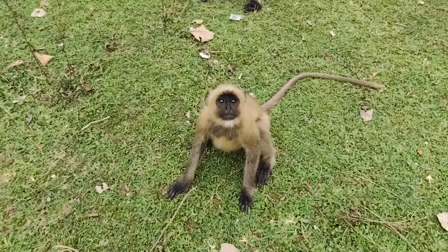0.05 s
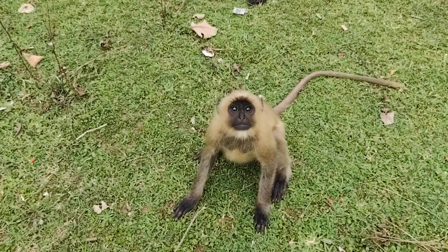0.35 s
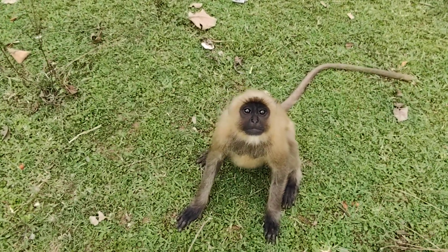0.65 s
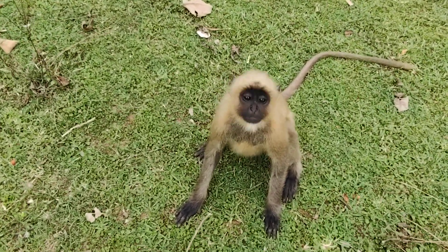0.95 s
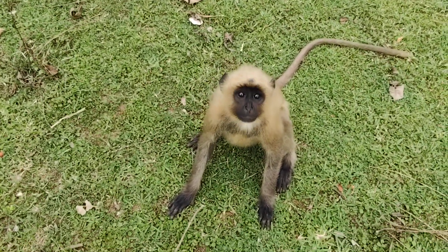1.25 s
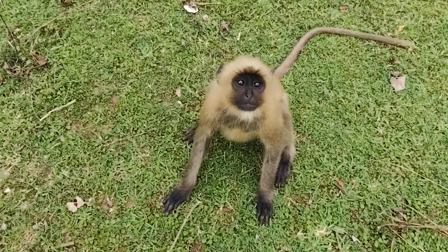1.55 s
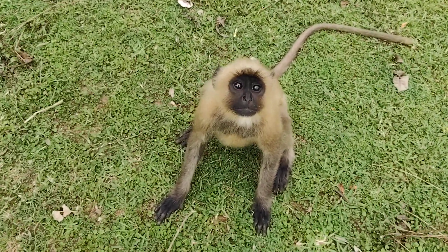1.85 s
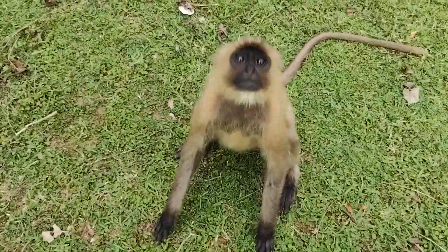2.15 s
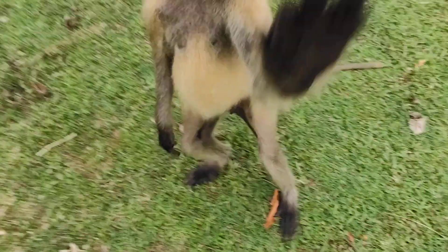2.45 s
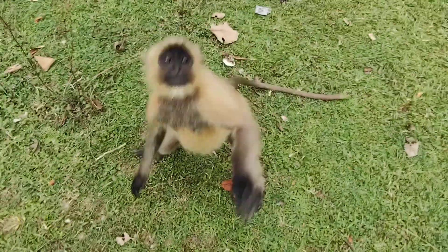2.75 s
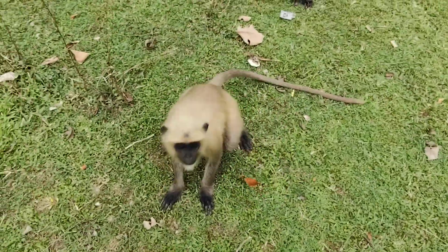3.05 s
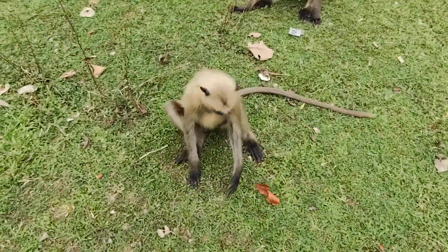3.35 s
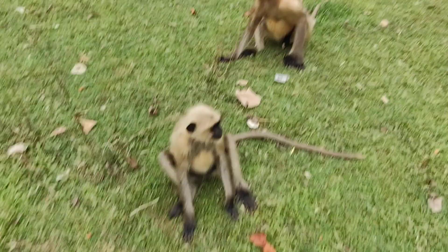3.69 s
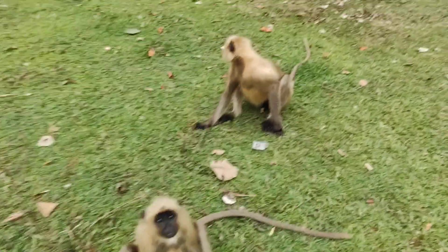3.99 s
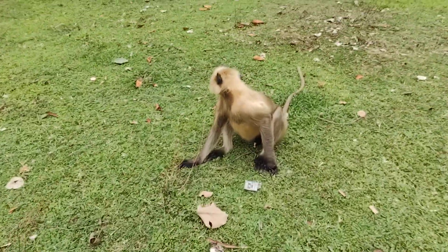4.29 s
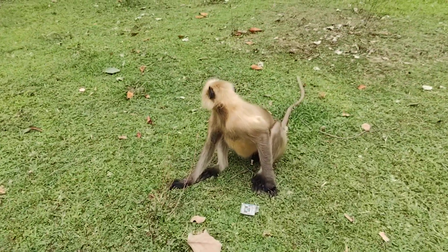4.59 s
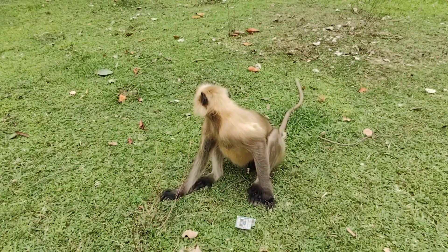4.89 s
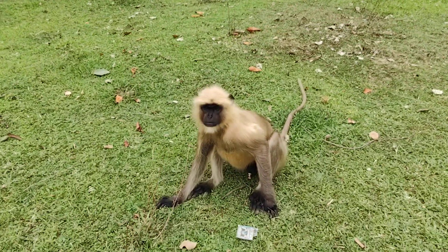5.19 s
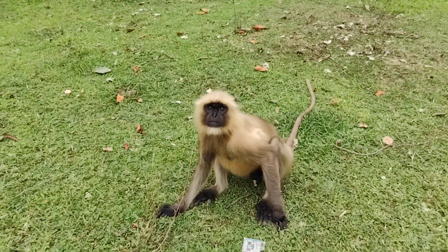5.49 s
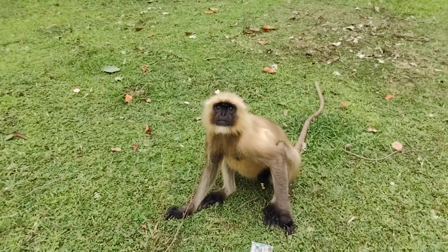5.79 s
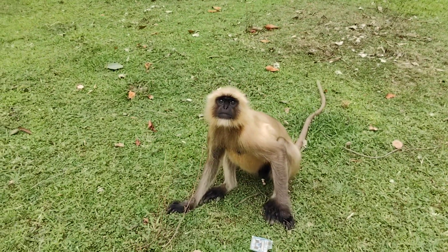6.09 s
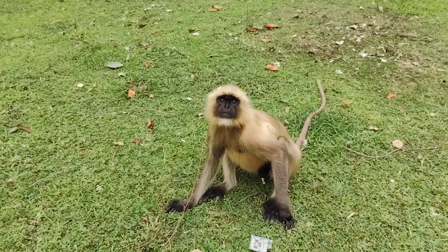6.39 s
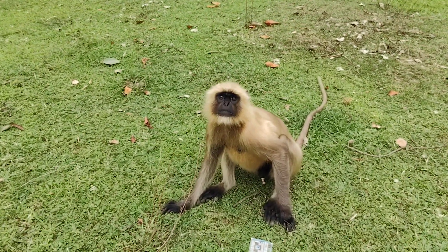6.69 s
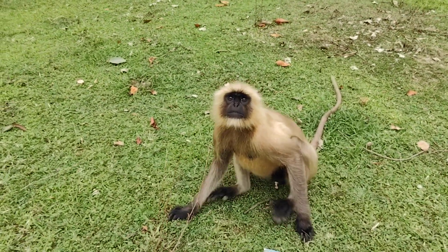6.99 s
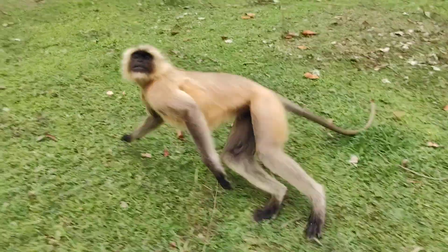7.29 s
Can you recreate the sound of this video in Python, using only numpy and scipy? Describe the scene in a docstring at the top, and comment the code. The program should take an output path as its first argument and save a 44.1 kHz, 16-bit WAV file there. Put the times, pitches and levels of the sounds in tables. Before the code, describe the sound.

A low, gusty wind rumble and faint hiss run throughout on an open lawn. In the first 0.7 seconds, fingers bump and knock on the microphone, mostly on the left, with another low thump at 2.7 seconds. A small bird repeats a high, rising two-note chirp every half second or so, faint at first and clearest from 3.2 to 5.2 seconds. Other birds whistle softly in the trees. A far dog gives several bending howls between 0.6 and 4.7 seconds. Monkeys moving on the grass make soft rustles and tiny stem snaps around 2.6 to 3.4 seconds and 4.3 to 5.4 seconds. At about 5.6 seconds, one sharp, hollow click stands out on the left. More rustling follows from 6 to 6.5 seconds and just after 7, with two light taps. Very faint distant horns drone briefly at 3 seconds and again from 5.

```python
"""A low rumble and a few knocks of fingers on the camera come first, as a small bird starts repeating
a two-note rising chirp. Dry stems snap and grass rustles under monkeys moving on a lawn. Other birds
whistle in the trees, a far dog howls, faint horns drone, and late on comes one sharp, hollow click.
Voices and horns are gliding tones with an echo from the trees, the grass is a spray of tiny snaps,
and the knocks and the click are rings that die quickly."""
import sys
import numpy as np
from scipy import signal
from scipy.fft import rfft, irfft, next_fast_len
from scipy.io import wavfile
from scipy.ndimage import uniform_filter1d, map_coordinates

SR = 44100
rng = np.random.default_rng(int(sys.argv[2]) if len(sys.argv) > 2 else 0)


def to_wav(sig):
    """Store sig (one row per channel, or 1-D mono) as 16-bit WAV at the path in sys.argv[1].

    Samples outside -1..1 are clipped; the rate is SR.
    """
    pcm = np.clip(np.atleast_2d(sig), -1, 1) * 32767
    pcm = np.round(pcm).astype(np.int16)
    wavfile.write(sys.argv[1], SR, pcm.T)  # frames by channels


N = 323914


def amp(db):
    """Turn decibels into a gain to multiply by."""
    return 10 ** (np.asarray(db) / 20)


def unit(x):
    """Scale a signal to an average (rms) level of 1."""
    return x / np.sqrt(np.mean(x ** 2) + 1e-20)


def along(points, hz):
    """Read between (frequency, value) points, on an axis that spaces octaves evenly."""
    freqs, values = np.transpose(points)
    return np.interp(np.log(hz + 1), np.log(freqs + 1), values)


def curves(rows, at):
    """Read each later column of a table at the given places in its first column."""
    places, *columns = np.transpose(rows)
    return [np.interp(at, places, column) for column in columns]


def clock(length):
    """Sample times for a sound of this many seconds."""
    return np.arange(int(length * SR)) / SR


def wobble(rate, size=N):
    """A smooth curve through `rate` random values a second."""
    values = rng.standard_normal(int(size * rate / SR) + 4)
    return map_coordinates(values, [np.arange(size) * rate / SR])


def filtered(x, response):
    """Multiply each frequency in x by response(frequency)."""
    size = next_fast_len(N + SR // 2)
    return irfft(rfft(x, size) * response(np.fft.rfftfreq(size, 1 / SR)), size)[..., :N]


def shaped(x, colour):
    """Turn frequencies up or down by a table of (frequency [Hz], gain [dB])."""
    return filtered(x, lambda hz: amp(along(colour, hz)))


def coloured(x, colour):
    """Shape x, then bring it to an average level of 1."""
    return unit(shaped(x, colour))


def patchy(x, depth_db, frames):
    """Shift the colour of noise at random, in patches some frames long (6 ms a frame)."""
    spectra = signal.stft(x, nperseg=512)[2]
    patches = uniform_filter1d(rng.standard_normal(spectra.shape[1:]), 5, axis=0)
    patches = uniform_filter1d(patches, frames, axis=1)
    return unit(signal.istft(spectra * amp(depth_db * unit(patches)), nperseg=512)[1][:, :N])


def sides(db):
    """Left and right gains for a pan: how many dB louder the left side is."""
    return amp(np.array([[.5], [-.5]]) * db)


def left_first(x, lead_s):
    """Let a sound reach the left ear lead_s seconds before the right."""
    return filtered(x, lambda hz: np.exp(1j * np.pi * hz * lead_s * np.array([[1], [-1]])))


def add(track, start, sound):
    """Mix a sound into a track, `start` seconds in."""
    part = track[..., max(0, round(start * SR)):][..., :sound.shape[-1]]
    part += sound[..., :part.shape[-1]]


def tone(hz, db, fade_s, partials=((1, 0),)):
    """A gliding tone with soft ends; its partials are (multiple of the pitch, level [dB])."""
    t = np.arange(len(hz)) / SR
    phase = 2 * np.pi * np.cumsum(hz) / SR
    ends = np.sin(np.pi / 2 * np.clip(np.minimum(t, t[-1] - t) / fade_s, 0, 1)) ** 2
    return np.sqrt(2) * ends * amp(db) * sum(amp(level) * np.sin(k * phase) for k, level in partials)


def outdoors(x, direct_db, echo_db, lead_s=0):
    """The direct sound plus its echo, scattered by the trees."""
    # how long the echo lasts: (frequency [Hz], time to fall 60 dB [s])
    trees = [(300, 0.22), (700, 0.73), (2000, 0.46), (4500, 0.37), (9000, 0.044)]
    hz, t, spectra = signal.stft(rng.standard_normal((2, SR)), SR, nperseg=256)
    tail = signal.istft(spectra * amp(-60 * t / along(trees, hz)[:, None]), SR, nperseg=256)[1]
    echo = signal.fftconvolve(x[None], tail / np.linalg.norm(tail[0]), axes=1)[:, :N]
    return amp(direct_db) * left_first(x, lead_s) + amp(echo_db) * echo


def background():
    """A low rumble that gives way to gusts when air strikes one side of the microphone, and a hiss."""
    # the rumble's rise and fall: (time [s], level [dB])
    levels = [(0.0, -47.5), (0.36, -40.5), (0.54, -46), (1.26, -54.5), (1.44, -40.5), (1.98, -53),
              (2.76, -40), (3.06, -47), (3.66, -51), (3.78, -56), (4.08, -55), (4.2, -43.5), (4.92, -53),
              (5.22, -47.5), (6.45, -49.5), (6.65, -44), (7.03, -48.5), (7.2, -42), (7.32, -47)]
    # which side the air strikes: (time [s], pan [dB])
    lean = [(0.0, 10.5), (0.39, 8), (0.49, -7), (1.8, 0), (3.68, -14), (3.87, 3), (4.49, -7.5), (7.1, -6)]
    # colours of the rumble, gusts and hiss: (frequency [Hz], gain [dB])
    rumble_colour = [(12, -47.5), (20, -14.5), (54, 2), (72, 6), (88, -1), (134, -15), (225, -30.5),
                     (300, -43), (400, -66), (520, -62.5), (880, -120)]
    gust_colour = [(15, -6), (40, -2.5), (65, -4), (110, -19), (250, -45.5), (600, -58.5)]
    hiss_colour = [(150, 16), (300, 0), (450, 0.5), (660, 14), (900, 0), (1500, -4.5), (4400, -5),
                   (6000, -12.5), (6900, -11), (7700, 8), (8300, 5.5), (9200, -4.5), (11000, -12.5),
                   (14000, -25)]
    now = np.arange(N) / SR
    (level_db,), (pan_db,) = curves(levels, now), curves(lean, now)
    centre = coloured(rng.standard_normal(N), rumble_colour) * amp(-.3 * abs(pan_db))
    swirl = rng.standard_normal((2, N)) * amp(3.5 * wobble(8.6))
    gusts = coloured(swirl, gust_colour) * amp(1.31 * abs(pan_db))
    rumble = amp(level_db) * (.96 * centre * sides(.5 * pan_db) + .33 * gusts * sides(pan_db))
    hiss_db = -63.5 + 1.2 * wobble(3)
    air = patchy(rng.standard_normal((2, N)), depth_db=2.3, frames=16)
    return rumble + amp(hiss_db) * coloured(air, hiss_colour)


def hum():
    """A low drone that wavers in pitch and level."""
    return tone(hz=74.8 * (1 + .025 * wobble(5)), db=-62 + 3.5 * wobble(3), fade_s=.02)


def knocks():
    """Fingers shift on the camera: each touch gives a few dying swings of the case and a dry scrape."""
    # touches: (time [s], level [dB], pitch of the case [Hz], pan [dB])
    touches = [(0.157, -38, 332, 15.5), (0.337, -22, 70.5, 19.5), (.512, -36, 1410, 13),
               (0.538, -34.5, 910, 14), (.579, -22, 1770, 18), (.603, -27.5, 1130, 18),
               (0.703, -38, 870, 4), (2.738, -26, 53, -14), (6.941, -42.5, 1240, 5),
               (7.216, -43, 1170, -10)]
    # colour of the scrape: (frequency [Hz], gain [dB])
    colour = [(300, -22), (1000, 2), (3000, 3), (6000, -25), (8300, 3.5), (12000, -30)]
    contact_s, ring_cycles, scrape_db, scrape_s = .0028, 3.05, -1.5, .0047
    swings, scrapes, t = np.zeros((2, N)), np.zeros((2, N)), clock(.2)
    for start, db, hz, pan_db in touches:
        gain = amp(db) * sides(pan_db)
        ring_s = contact_s + ring_cycles / hz
        envelope = (1 - np.exp(-8 * hz * t)) * amp(-60 * t / ring_s)
        add(swings, start, gain * envelope * np.sin(2 * np.pi * hz * t))
        hardness = min(hz / 1500, 1) ** 2  # soft, low thumps hardly scrape
        scrape = rng.standard_normal((2, len(t))) * amp(scrape_db - 60 * t / scrape_s)
        add(scrapes, start, gain * hardness * scrape)
    return swings + shaped(scrapes, colour)


def near_bird():
    """Each chirp is two overlapping, rising notes, carried by the second harmonic with a noisy rasp."""
    # chirps: (time [s], opening note, its extra level [dB], its starting pitch [ratio],
    # length of the closing sweep [s], level [dB], extra level of the low tones [dB])
    calls = [(.172, "flick", -15, 1, .06, -65, -9), (.972, "flick", -7, 1, .07, -59.5, -7),
             (1.395, "lead", -2, 1.05, .055, -62, -4), (2.066, "flick", -2, 1, .08, -60, -7),
             (2.436, "lead", 0, 1.15, .07, -50, 1), (3.222, "flick", -1, 1, .085, -45.5, -9),
             (3.645, "lead", 1, 1.02, .068, -44, -4), (4.26, "flick", 0, 1, .083, -43.5, -1),
             (5.058, "lead", 0, .99, .07, -42.5, 0)]
    # opening note: length [s]
    opening_s = {"lead": .091, "flick": .061}
    # each note's path: (place in the note [0-1], pitch heard [Hz], level [dB])
    shapes = { "lead": [(0, 4150, -12), (.15, 4400, 1), (.3, 4200, -3), (.45, 4080, -2), (.62, 4500, 2),
              (.82, 4950, 1), (1, 5350, -2)], "flick": [(0, 2950, -18), (.22, 3400, -2), (.45, 3750, -1),
              (.6, 4550, -1), (.8, 4900, 0), (1, 5400, -5)], "sweep": [(0, 2200, -18), (.2, 2530, -5),
              (.31, 2700, -2), (.33, 3000, -16), (.38, 3250, -2), (.55, 3400, -6), (.7, 3650, -3),
              (.82, 4200, 1), (.86, 5100, -8), (.92, 5300, -2), (1, 5500, -7)]}
    # strength of the upper harmonics, and colour of the rasp: (frequency [Hz], gain [dB])
    overtones = [(5000, -24), (6300, -27), (8400, -19), (9300, -29), (11000, -40)]
    rasp_colour = [(900, -21), (2200, -6), (5000, -4), (6000, -22), (8200, -1.5), (11000, -24)]
    overlap_s, near_db = .029, -43.5
    song, scattered = np.zeros(N), np.zeros(N)
    rasp = amp(-13) * coloured(rng.standard_normal(N), rasp_colour)
    for when, opening, opening_db, ratio, sweep_s, db, low_db in calls:
        far_db = max(near_db - db, 0)  # quieter calls are farther off, so more of them is echo
        notes = [(when, opening_s[opening], opening, ratio, db + opening_db),
                 (when + opening_s[opening] - overlap_s, sweep_s, "sweep", 1, db)]
        for start, length, shape, stretch, note_db in notes:
            t = clock(length)
            hz, shape_db = curves(shapes[shape], t / length)
            hz = hz * stretch ** (1 - (t / length) ** 3)
            level_db = note_db + shape_db
            register_db = np.interp(hz, [2800, 3200], [low_db, 0])
            waver = 1 + .016 * wobble(600, len(t))
            flutter_db = 3.5 * wobble(200, len(t))
            partials = [(1, -9 + low_db if shape == "lead" else -30), (2, 0),
                        (3, along(overtones, 1.5 * hz) - 3), (4, along(overtones, 2 * hz))]
            note = tone(hz / 2 * waver, level_db + register_db + flutter_db, .003, partials)
            note += rasp[round(start * SR):][:len(t)] * amp(level_db)
            add(song, start, note * amp(-.07 * far_db))
            add(scattered, start, note * amp(-12 + .77 * far_db))
    return (outdoors(song, direct_db=0, echo_db=-13.5, lead_s=.00028)
            + outdoors(scattered, direct_db=-60, echo_db=0))


def stems():
    """Dry stems break, each with a bright, splintering tick."""
    # breaks: (time [s], level [dB], pan [dB])
    breaks = [(0.45, -46.5, -4), (2.693, -47, -9), (3.064, -51, -2), (3.146, -46, -2), (4.344, -41.5, -4),
              (4.676, -53.5, -1), (4.926, -53.5, 0), (4.945, -46, -3), (5.437, -46, 1)]
    # colour of a tick: (frequency [Hz], gain [dB])
    colour = [(500, -11), (2500, -6.5), (4200, -2.5), (6000, -22), (8200, 14.5), (10500, -10), (14000, -18)]
    track, t = np.zeros((2, N)), clock(.05)
    fade_db = 1 - 60 * t / .052
    for start, db, pan_db in breaks:
        splinters = amp(3 * wobble(1500, len(t))) * rng.standard_normal((2, len(t)))
        add(track, start, amp(db + fade_db) * sides(pan_db) * splinters)
    return shaped(track, colour)


def far_birds():
    """Whistles slide and arch, blurred by the trees; the buzziest are heard mostly as echo."""
    # whistles: (time [s], song, middle pitch [Hz], level [dB])
    whistles = [(.487, "fall", 3830, -64.5), (0.778, "fall", 2875, -73.5), (1.564, "rise", 4520, -62),
                (1.639, "drop", 1046, -68.5), (1.769, "rise", 4810, -68), (2.321, "rise", 4380, -67),
                (2.49, "drop", 1075, -62), (3.764, "hold", 1221, -59), (3.84, "pipe", 1467, -64),
                (3.969, "drop", 1301, -64.5), (4.173, "rise", 4580, -55), (4.691, "pipe", 1128, -62.5),
                (4.865, "fall", 3133, -60), (4.96, "pipe", 1223, -59.5), (5.431, "hold", 3196, -58.5),
                (5.82, "hold", 2265, -69.5), (6.615, "rise", 4660, -58), (6.868, "rise", 4560, -63.5)]
    # songs: (length [s], slide [octaves], arch [octaves], buzz [share of pitch], direct [dB], pan [dB])
    songs = {"rise": (0.09, 0.27, 0.036, .05, -14, 0), "fall": (.11, -0.32, -0.04, .008, -2.5, -6),
             "pipe": (.085, .2, .18, .025, -1.5, 0), "drop": (0.056, -.22, 0.035, .016, -3, 0),
             "hold": (0.08, 0, .005, .016, -5, 0)}
    song, direct = np.zeros(N), np.zeros((2, N))
    for start, kind, middle_hz, db in whistles:
        length, slide, arch, buzz, direct_db, pan_db = songs[kind]
        place = clock(length) / length - .5  # 0 at the middle of the note
        hz = middle_hz * 2 ** (slide * place - arch * (2 * place) ** 2)
        waver = 1 + buzz * wobble(600, len(place))
        note = tone(hz * waver, db + 2 * wobble(120, len(place)), fade_s=.02)
        add(song, start, note)
        add(direct, start, note * amp(direct_db) * sides(pan_db))
    return direct + outdoors(song, direct_db=-60, echo_db=-4.5)


def dog():
    """Distance leaves each howl an almost pure, bending tone; hoarse ones shake and echo more."""
    # howls: (time [s], length [s], arc, top pitch [Hz], level [dB], hoarseness [0-1])
    howls = [(.62, .315, "sag", 675, -56.5, .2), (1.11, .15, "lift", 635, -61.5, .3),
             (1.46, .49, "arch", 755, -57, .2), (2.52, .49, "step", 672, -62, .8),
             (3.31, .52, "step", 672, -64, 1), (4.13, .57, "step", 672, -61.5, .8)]
    # each arc's path: (place in the howl [0-1], pitch [share of the top], level [dB])
    arcs = { "sag": [(0, 1, -6), (.15, .99, 0), (.35, .975, -1), (.5, .975, -10), (.7, .96, 2),
            (.83, .94, 2), (1, .77, -10)], "lift": [(0, .81, -8), (.45, .91, 1), (1, 1, -5)],
            "arch": [(0, .81, -9), (.08, .83, -6), (.11, .92, 0), (.24, .985, -3), (.33, 1, -2),
            (.6, .945, 1), (.82, .91, -2), (.91, .86, 0), (1, .77, -9)], "step": [(0, .88, -3),
            (.08, .85, 3), (.11, .99, 2), (.25, 1, -2), (.7, .99, -1), (.9, .95, 0), (1, .78, -9)]}
    voice, scattered = np.zeros(N), np.zeros(N)
    for start, length, arc, top_hz, db, hoarse in howls:
        t = clock(length)
        ratio, arc_db = curves(arcs[arc], t / length)
        hz = top_hz * ratio * (1 + .028 * hoarse * wobble(110, len(t)))
        flutter_db = 3.8 * hoarse * wobble(55, len(t))
        howl = tone(hz, db + arc_db + flutter_db, fade_s=.008, partials=[(1, 0), (2, -31)])
        add(voice, start, howl)
        add(scattered, start, hoarse * howl)
    return (outdoors(voice, direct_db=0, echo_db=-14, lead_s=.00043)
            + outdoors(scattered, direct_db=-60, echo_db=-4))


def crackle(per_second, spread_db):
    """Stereo noise made of tiny random snaps; spread_db makes their sizes more unequal."""
    snaps = rng.random((2, N)) < per_second / SR
    size = amp(spread_db * np.minimum(rng.exponential(size=(2, N)), 3))
    return unit(snaps * size * rng.standard_normal((2, N)))


def grass():
    """A hand or foot crushes blades and stalks; the blades then spring back in a fading crackle."""
    # presses: (time [s], half width [s], blade level [dB], stalks against blades [dB])
    crunches = [(0.721, 0.045, -70, 5), (2.591, 0.015, -63.5, -17), (2.611, 0.014, -61.5, 2.5),
                (2.642, 0.0068, -61.5, 3), (2.697, 0.0062, -65.5, 2), (2.743, 0.022, -79, 8.5),
                (3.005, 0.032, -63, -3), (3.061, 0.0045, -59.5, -4), (3.151, 0.009, -59, -2.5),
                (3.2, 0.088, -75.5, -0.5), (3.42, 0.064, -76.5, -14), (4.35, 0.038, -66.5, 4.5),
                (4.436, 0.015, -75, 13.5), (5.07, 0.012, -66.5, 8.5), (5.125, 0.024, -70, 6.5),
                (5.207, 0.025, -70, 5), (5.411, 0.039, -71, 7.5), (6.03, 0.019, -68, -15),
                (6.122, 0.015, -58.5, -8), (6.213, 0.02, -60, -8.5), (6.275, 0.019, -65, -17),
                (6.332, 0.026, -57, -27), (6.376, 0.016, -57.5, -3), (6.53, 0.077, -71, -23),
                (7.158, 0.029, -61, -0.5), (7.265, 0.034, -62, -22)]
    # colours of the blades and stalks: (frequency [Hz], gain [dB])
    blade_colour = [(530, -89.5), (900, -11), (1770, -16.5), (2130, -10.5), (2650, -19), (3120, -20),
                    (4180, -7), (5720, -14.5), (6650, -10.5), (8200, 9.5), (11200, -3), (12000, -16),
                    (14500, -15.5)]
    stalk_colour = [(400, -2), (1200, 4), (2200, -1), (3800, 6), (6000, -7.5), (12000, -41)]
    settle_db, settle_s, breaks_per_s = -10, .35, 1400
    now = np.arange(N) / SR
    blades, stalks = np.zeros((2, N))
    for when, width, db, stalk_db in crunches:
        press = amp(db) * np.exp(-.5 * ((now - when) / width) ** 2)
        spring_back = (now > when) * amp(db + settle_db - 60 * abs(now - when) / settle_s)
        blades += press + spring_back
        stalks += press * amp(stalk_db)
    uneven = amp(1.5 * wobble(50) + 2.6 * wobble(350))
    # single dry blades break under the weight, each dying away fast
    breaking = signal.lfilter([1], [1, -.96], rng.random(N) < breaks_per_s / SR)
    fine = crackle(per_second=8200, spread_db=0)
    fine += amp(-17) * unit(breaking * rng.standard_normal((2, N)))
    fine = coloured(patchy(fine, depth_db=3, frames=4), blade_colour)
    coarse = crackle(per_second=1500, spread_db=3)
    coarse = coloured(patchy(coarse, depth_db=4, frames=4), stalk_colour)
    return uneven * (amp(11.5) * blades * fine * sides(2.6) + amp(5.5) * stalks * coarse)


def horns():
    """Faint held notes from a distant road, fading in and out on the moving air."""
    # notes, played 1% below the listed pitch: (time [s], length [s], pitch [Hz], level [dB])
    notes = [(2.987, 0.22, 441, -78.5), (5.103, 0.85, 290, -81), (6.209, 0.66, 350.5, -80),
             (6.81, 0.46, 297, -76.5)]
    drone = np.zeros(N)
    for start, length, hz, db in notes:
        size = int(length * SR)
        fading_db = 4.5 * wobble(16, size)
        waver = 1 + .01 * wobble(25, size)
        add(drone, start, tone(hz * waver, db + fading_db, fade_s=.019, partials=[(.99, .0052)]))
    return outdoors(drone, direct_db=2.5, echo_db=-8.5)


def chorus():
    """A brief burst of 36 faint, overlapping low calls from deep in the trees."""
    start_s, spread_s, call_s = 4.55, .92, .08
    song, place = np.zeros(N), clock(call_s) / call_s
    for when, pitch, slide, softness in rng.random((36, 4)):
        hz = 750 * 2 ** (.9 * pitch + .35 * (slide - .5) * place)
        waver = 1 + .025 * wobble(300, len(place))
        call = tone(hz * waver, -71.5 - 6 * softness, fade_s=.025, partials=[(1, 0), (2, -14)])
        add(song, start_s + spread_s * when, call)
    return outdoors(song, direct_db=-2.5, echo_db=-2.5)


def click():
    """A bright snap to the left, then a small hollow rings, its pitch rising as it opens."""
    # quick contacts that make up the click: (time [s], snap level [dB], hollow level [dB])
    contacts = [(5.532, -40, -48), (5.537, -40, -48), (5.5435, -38, -43), (5.5703, -8, -17.5),
                (5.576, -24, -33), (5.5956, -36, -40)]
    # tones of the snap: (pitch [Hz], level [dB], time to fall 60 dB [s])
    rings = [(7910, 2.5, 0.0048), (8210, 1, 0.0049), (9700, 5.5, 0.0026), (3280, -21, 0.0033),
             (2500, -23, 0.005)]
    # colour of the gritty spray around the click: (frequency [Hz], gain [dB])
    grit_colour = [(300, -2.5), (1700, 16.5), (3700, 9.5), (5200, -26), (8000, 21), (13000, -10)]
    rise_s, open_s, ring_s, spray_s = .0004, .0026, .026, .03
    track, grit, t = np.zeros((2, N)), np.zeros((2, N)), clock(.1)
    snap = sum(amp(db - 60 * t / fall_s) * np.sin(2 * np.pi * hz * t) for hz, db, fall_s in rings)
    snap *= 1 - np.exp(-t / rise_s)
    hollow_hz = 1650 - 450 * np.exp(-t / .0019)
    envelope = np.minimum(t / open_s, amp(-60 * (t - open_s) / ring_s))
    hollow = envelope * np.sin(2 * np.pi * np.cumsum(hollow_hz) / SR)
    for start, snap_db, hollow_db in contacts:
        add(track, start, amp(snap_db) * snap * sides(7.5) + amp(hollow_db) * hollow)
        spray = amp(-60 * t / spray_s) * rng.standard_normal((2, len(t)))
        add(grit, start, amp(-32 + .35 * hollow_db) * spray)
    return left_first(track, lead_s=.000095) + shaped(grit, grit_colour)


def scene():
    """Everything heard from the lawn."""
    return (background() + hum() + knocks() + near_bird() + stems() + far_birds()
            + dog() + grass() + horns() + chorus() + click())


def record(dry):
    """The camera cuts off the highest treble."""
    top_hz = 14400
    return filtered(dry, lambda hz: 1 / (1 + (hz / top_hz) ** 120))


dry = scene()
out = record(dry)
to_wav(out)
```